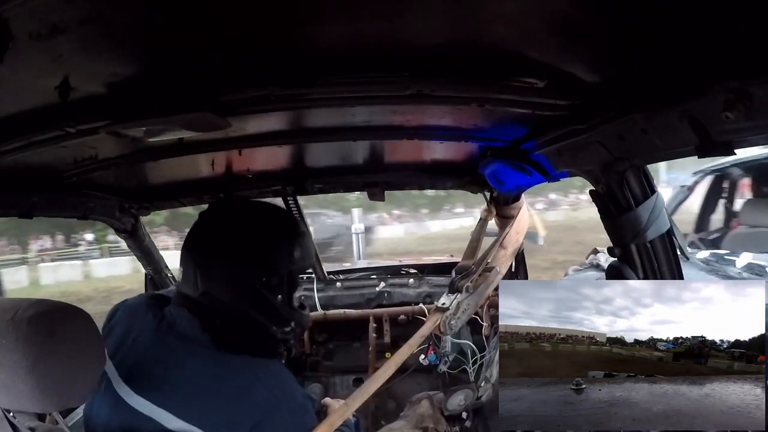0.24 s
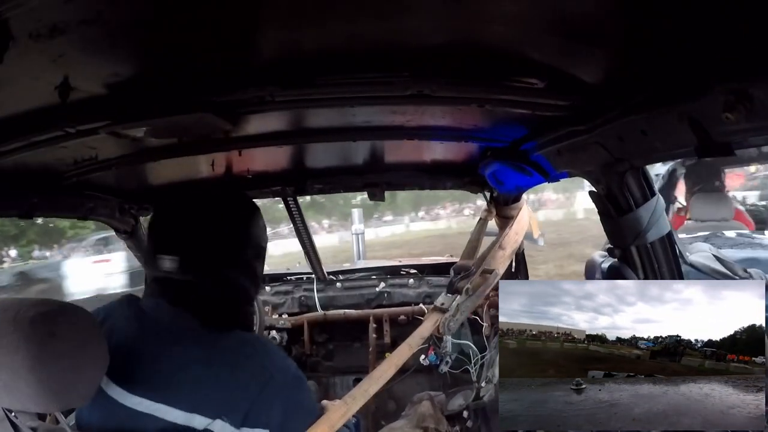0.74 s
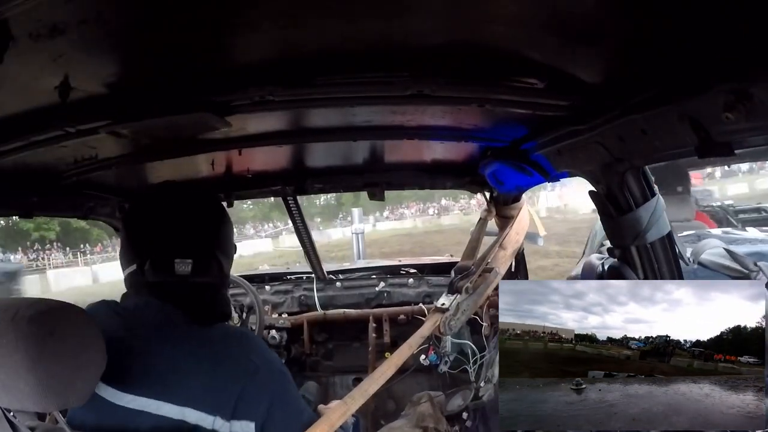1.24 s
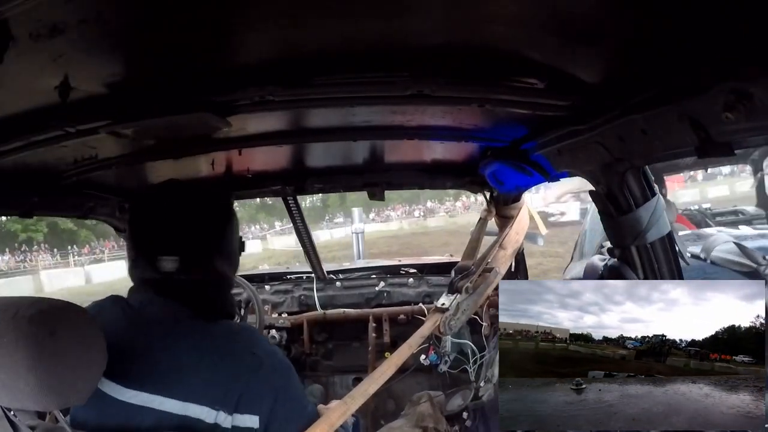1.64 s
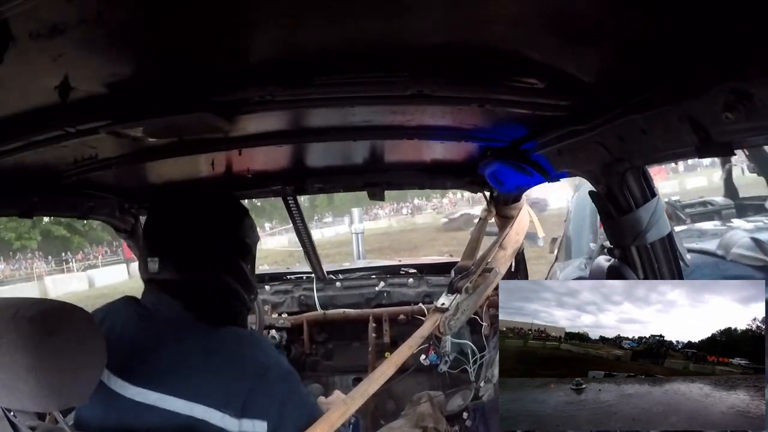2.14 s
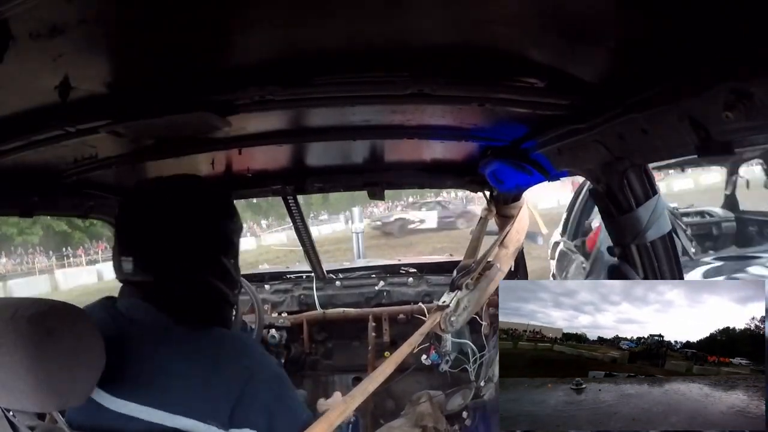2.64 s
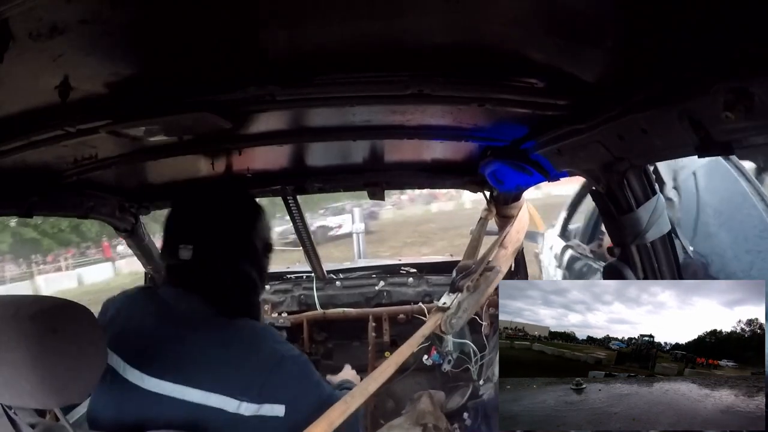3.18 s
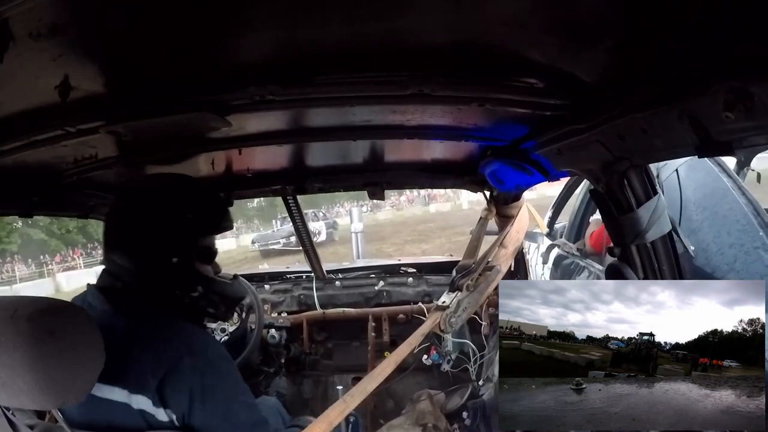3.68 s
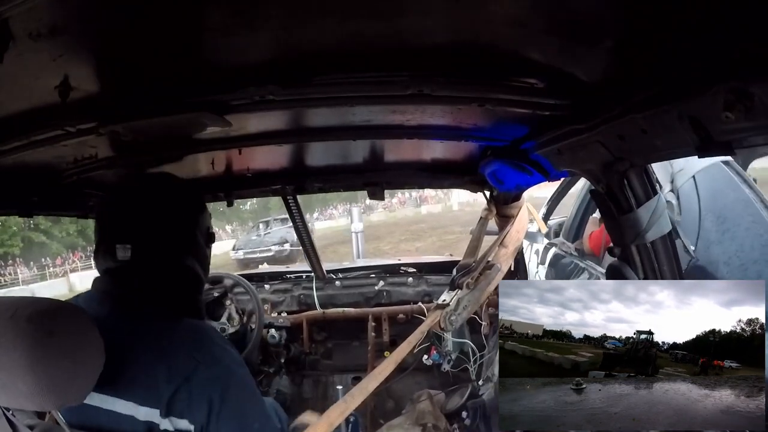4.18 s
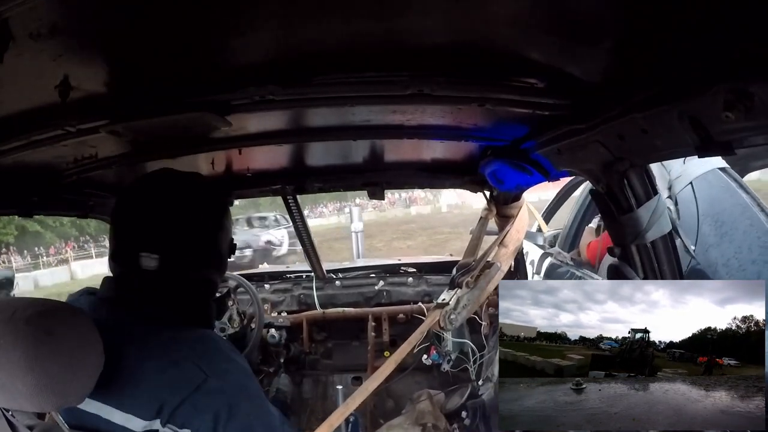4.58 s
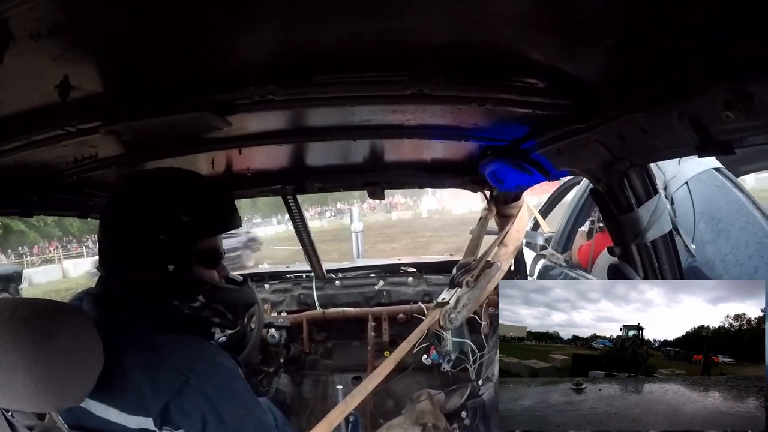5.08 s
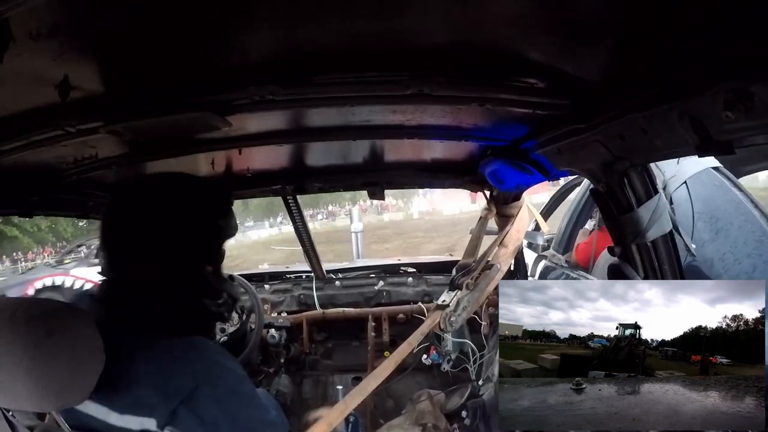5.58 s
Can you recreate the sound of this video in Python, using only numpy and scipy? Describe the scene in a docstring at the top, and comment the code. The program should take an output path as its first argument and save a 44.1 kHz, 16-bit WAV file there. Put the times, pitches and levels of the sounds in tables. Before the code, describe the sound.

Heard from inside a stripped car, a six-cylinder engine roars at steady high revs, drops away, then is blipped three times, its exhaust rasping at the peaks. Another car's engine drones roughly alongside, fading in and out. Throughout, the bare cab booms and loose metal rattles, with bursts of chattering panels, short metallic scrapes and two dull, heavy thumps against the body.

```python
"""Inside a derby car

A six-cylinder engine roars, drops and is blipped three times, its periodic firing heard as harmonics
and as puffs of exhaust noise. A neighbouring car drones alongside. The stripped cab booms in its low
modes, loose metal rattles, struck panels ring, and dragged metal scrapes and sizzles by stick and slip.
At the top of a rev the exhaust rasps."""
import sys
import numpy as np
from scipy import signal
from scipy.io import wavfile
from scipy.ndimage import uniform_filter1d

SR = 44100
rng = np.random.default_rng(int(sys.argv[2]) if len(sys.argv) > 2 else 0)


def dump(signal):
    """Clip the signal to [-1, 1] and save it as 16-bit WAV at the path in sys.argv[1]."""
    limited = np.clip(np.atleast_2d(signal).T, -1, 1)
    pcm = np.round(limited * 32767).astype(np.int16)
    wavfile.write(sys.argv[1], SR, pcm)


N = 256662
DULL_HZ = 9800   # upper edge of everything but the sizzle

# bending modes of the body panels: pitch_hz, relative_db, t60_s
PANEL_MODES = [(626, -7, 0.099), (1164.5, -9.5, 0.15), (1258, -3, 0.046), (1630, 2, 0.01),
               (1720, -3, 0.014), (2210, -10.5, 0.019), (2523, -7, 0.017), (3100, -9.5, 0.0082),
               (4900, -21.5, 0.015)]


def amp(db):
    """Amplitude grows tenfold for each 20 dB."""
    return 10 ** (np.asarray(db) / 20)


def rms_one(x):
    """Normalisation to an rms of 1."""
    return x / np.sqrt(np.mean(x ** 2) + 1e-20)


def in_time(rows):
    """Linear interpolation over the first column, time, turns each other column into a signal."""
    times_s, *columns = np.transpose(rows)
    return [np.interp(np.arange(N) / SR, times_s, column) for column in columns]


def at_hz(response, hz):
    """A frequency response in dB, interpolated on a logarithmic frequency axis."""
    table_hz, level_db = np.transpose(response)
    return np.interp(np.log(hz), np.log(table_hz), level_db)


def bandpass(x, low_hz, high_hz, order):
    """A Butterworth filter passes the band between two edges."""
    return signal.sosfilt(signal.butter(order, [low_hz, high_hz], "band", fs=SR, output="sos"), x)


def drift(rate_hz):
    """Low-passed noise gives a slow random fluctuation of rms 1."""
    step, settle = 40, 2000   # samples per noise value; values dropped while the filter settles
    pole = np.exp(-2 * np.pi * rate_hz * step / SR)
    noise = rng.standard_normal(N // step + settle + 2)
    slow = signal.lfilter([1], [1, -2 * pole, pole * pole], noise)[settle:]
    return np.interp(np.arange(N) / step, np.arange(len(slow)), rms_one(slow))


def ring(clicks, hz, t60_s):
    """A damped oscillator answers a unit impulse with a decaying sine of height 1."""
    decay, angle = amp(-60 / (t60_s * SR)), 2 * np.pi * hz / SR
    return signal.lfilter([0, np.sin(angle)], [1, -2 * decay * np.cos(angle), decay ** 2], clicks + 1e-18)


def tone(turns, level_db, wobble_db, wobble_hz, slip_turns):
    """Random amplitude and phase modulation roughen a sine whose rms wavers about level_db."""
    phase = turns + rng.random() + slip_turns * drift(wobble_hz)
    return np.sqrt(2) * amp(level_db + wobble_db * drift(wobble_hz)) * np.sin(2 * np.pi * phase)


def bands(noise_pair, spectrum, patchy_db, tilt_db=0, flicker_db=0):
    """Spectral shaping in third octaves, each wavering alone; tilt and flicker act on the treble."""
    bottom_hz, top_hz = spectrum[0][0], spectrum[-1][0]
    edges = np.geomspace(bottom_hz, top_hz, round(3 * np.log2(top_hz / bottom_hz)) + 1)
    out = 0
    for k, (low, high) in enumerate(zip(edges, edges[1:])):
        mid = np.sqrt(low * high)
        treble = np.clip(np.log2(mid / 2600) / 1.3, 0, 1)
        tilt_weight = treble + 13.1 * max(np.log2(min(mid, DULL_HZ) / 6200), 0)
        gain_db = at_hz(spectrum, mid) + patchy_db * drift(29) + tilt_weight * tilt_db + treble * flicker_db
        out = out + amp(gain_db) * bandpass(noise_pair[k % 2], low, high, order=3)
    return out


def engine():
    """Periodic firing, three times a bank per cycle, gives harmonics; unequal cylinders fill in between."""
    # firing rate of one bank: time_s, rate_hz
    speed = [(0, 57.3), (.1, 60.35), (.3, 64.63), (.9, 66.33), (1.45, 67.04), (2.4, 66.8), (2.82, 69.34),
             (3.1, 66.34), (3.31, 50.9), (3.43, 41.7), (3.65, 57.64), (3.72, 60.8), (3.84, 63.3),
             (3.92, 63.74), (4.0, 63.1), (4.1, 60.17), (4.2, 54.2), (4.3, 49.54), (4.4, 47.54),
             (4.54, 50.86), (4.7, 54.8), (4.8, 54.53), (4.9, 51.23), (5.14, 44.65), (5.25, 51.73),
             (5.39, 58.9), (5.55, 63.2), (5.64, 64.3), (5.73, 62.8), (5.82, 58)]
    # second and third harmonics of that rate: time_s, second_db, third_db
    low_harmonics = [(0, -29, -7.5), (.1, -17, -16.5), (.3, -9, -22), (.55, -16.5, -38), (.7, -13, -35),
                     (.8, -6.5, -40), (.93, -14, -28), (1.4, -26.5, -33), (1.68, -15, -23),
                     (1.8, -9.5, -28), (2.35, -10, -19), (2.5, -8.5, -13.5), (2.84, -14, -6.5),
                     (2.95, -12, -11.5), (3.11, -9, -16), (3.2, -41, -16.5), (3.4, -13, -13),
                     (3.5, -14, -17.5), (3.68, -26.5, -12.5), (3.75, -22.5, -15), (3.8, -16, -19),
                     (3.9, -24.5, -15), (4.02, -16.5, -18), (4.07, -18.5, -13.5), (4.3, -21, -7),
                     (4.4, -26, -16.5), (4.6, -11, -5.5), (4.67, -17.5, -21), (4.75, -19, -9.5),
                     (4.95, -13, -9), (5.12, -23, -19), (5.22, -19, -13.5), (5.36, -18, -12.5),
                     (5.45, -9, -15), (5.52, -30, -14.5), (5.65, -23, -17), (5.82, -15.5, -13)]
    # higher harmonics: multiple, level_at_55_hz_db, slope_db_per_hz
    high_harmonics = [(4, -24, -0.8), (5, -10, 0.15), (6, -19, -1.9)]
    # throttle, as gain of the higher harmonics: time_s, gain_db
    throttle = [(0, -20), (.1, -9), (.35, 2), (.7, -3), (1.5, -2), (2.5, -2.5), (2.82, -3.5), (2.87, -15),
                (2.92, -3.5), (3.1, -2), (3.25, -21), (3.4, -64), (3.55, -13.5), (3.7, 0.5), (3.9, 0.5),
                (4.1, 4.5), (4.19, 3.5), (4.26, 0), (4.3, -9), (4.45, -1), (4.55, -1), (4.7, 6),
                (4.88, 2.5), (4.93, -7), (5.15, -5.5), (5.24, -0.5), (5.33, 7.5), (5.4, 5.5), (5.6, 7),
                (5.73, 1.5), (5.77, 8.5), (5.82, 4)]
    # exhaust resonance that they glide through: frequency_hz, gain_db
    exhaust_response = [(170, -2.5), (205, 0), (232, -4.5), (262, -2.5), (280, -5.5), (308, -8.5),
                        (330, -14), (348, -23.5), (400, -31)]
    # engine load, as level of the exhaust roar: time_s, level_db
    load = [(0, -33.5), (.2, -30), (.42, -34.5), (.58, -30), (.72, -28.5), (.95, -35), (1.35, -25),
            (1.55, -28.5), (1.75, -25), (2.0, -27), (2.15, -34.5), (2.7, -38.5), (3.06, -26), (3.3, -40),
            (3.45, -31.5), (3.78, -28), (4.1, -28), (4.4, -27.5), (4.75, -31.5), (5.05, -26), (5.3, -36),
            (5.66, -25.5), (5.82, -30.5)]
    # weak orders of the full cycle, from unequal cylinders: order, level_db
    uneven_orders = [(3, -23.5), (4, -44.5), (5, -32.5), (7, -28), (8, -34.5), (10, -30.5), (11, -43.5),
                     (13, -27), (14, -48), (16, -35), (17, -33), (19, -41), (20, -33), (21, -39.5),
                     (22, -45), (24, -43.5), (25, -38), (27, -41), (30, -41.5), (33, -46), (35, -41)]
    # pipe and cab colour on the weak orders: frequency_hz, gain_db
    pipe_response = [(48, -32.5), (66, -0.5), (200, 3.5), (250, -2), (330, -11), (365, -4.5), (430, -2),
                     (520, -1), (680, -4), (760, -7)]
    inertia_s = 0.05   # the flywheel rounds changes of speed
    bank_hz = uniform_filter1d(in_time(speed)[0], int(inertia_s * SR), mode="nearest")
    turns = np.cumsum(bank_hz) / SR
    second_db, third_db = in_time(low_harmonics)
    roar_db, = in_time(load)
    throttle_db, = in_time(throttle)
    burble = 1 + 0.26 * np.maximum(52.83 - bank_hz, 0)   # firing grows uneven as the speed sags
    out = tone(2 * turns, second_db, wobble_db=2.2, wobble_hz=11, slip_turns=0.0093)
    out += tone(3 * turns, third_db, 1.97 * burble, 17.6, 0.047 * burble)
    for multiple, level_db, slope in high_harmonics:
        drive_db = level_db + slope * (bank_hz - 55) + throttle_db
        colour_db = at_hz(exhaust_response, multiple * bank_hz)
        out += tone(multiple * turns, drive_db + colour_db, 1.7 * burble, 19, 0.017 * burble)
    effort_db = 0.65 * (roar_db - np.mean(roar_db)) + 0.26 * throttle_db
    for order, level_db in uneven_orders:
        multiple = order / 3
        colour_db = at_hz(pipe_response, multiple * bank_hz)
        out += tone(multiple * turns, level_db + effort_db + colour_db, 4.5, 12.5, 0.12)
    return out, turns, roar_db


def neighbour():
    """Jitter in rate and phase broadens the partials of the engine alongside into a rough drone."""
    # course of the drone: time_s, firing_hz, level_db
    course = [(0.0, 116.5, -10), (0.41, 127.9, -8), (0.91, 128.4, -16), (1.04, 118.6, -7.5),
              (1.34, 119.2, -6.5), (1.7, 108, -7.5), (1.9, 120.9, -19.5), (2.43, 107, -21), (2.85, 95, -35),
              (3.2, 80, -16), (3.37, 121.6, -16.5), (4.15, 116.4, -12.5), (4.31, 103.6, -31),
              (4.8, 96, -32.5), (5.12, 118, -9), (5.45, 119.0, -14.5), (5.82, 121, -10.5)]
    # partials of its firing rate: multiple, gain_db
    partials = [(0.668, -9.5), (1, -4.5), (1.335, -22), (2.002, -37.5), (2.337, -42)]
    firing_hz, level_db = in_time(course)
    turns = np.cumsum(firing_hz * (1 + 0.014 * drift(7.15))) / SR
    return sum(tone(multiple * turns, level_db + gain_db, 1, 6.7, 0.15) for multiple, gain_db in partials)


def shell_boom():
    """Random forcing excites the low resonances of the bare cab, which boom in uneven swells."""
    # cab modes: centre_hz, width_hz, relative_db
    cab_modes = [(38, 14, -9.5), (56.3, 34, 4.5), (85.13, 3.4, 8), (121.6, 38, 10.5), (155.3, 28, 12),
                 (192.7, 8.3, 5.5)]
    # strength of the boom: time_s, level_db
    swells = [(0, -22), (.1, -11), (.25, -29), (.42, -8), (.55, -15), (.7, -13), (.9, -17), (1.25, -29),
              (1.6, -12), (1.75, -18.5), (2.05, -15.5), (2.25, -12.5), (2.45, -13.5), (2.9, -11),
              (3.08, -14), (3.35, -19), (3.5, -12), (3.8, -17), (4.25, -29.5), (4.42, -12), (4.85, -28.5),
              (5.05, -20), (5.35, -25), (5.82, -22)]
    boom = 0
    for hz, width, mode_db in cab_modes:
        mode = bandpass(rng.standard_normal(N), hz - width / 2, hz + width / 2, order=2)
        boom = boom + amp(mode_db) * rms_one(mode)
    level_db, = in_time(swells)
    return amp(level_db + 2.5 * drift(6.9)) * rms_one(boom)


def exhaust_roar(turns, level_db):
    """Amplitude modulation: exhaust noise puffs once for each firing of a bank."""
    # spectral density of the roar: frequency_hz, relative_db
    spectrum = [(130, -34.5), (220, 8), (274, -10), (327, -16.5), (372, -5), (432, -5), (998, -35),
                (1200, -29.5), (1560, -61.5), (2640, -120)]
    puffs = 1 + np.cos(2 * np.pi * turns)
    roar = bands(puffs * rng.standard_normal((2, N)), spectrum, patchy_db=1)
    return amp(level_db + 2.5 * drift(11)) * rms_one(roar)


def rattle():
    """Random impacts of loose metal form shot noise over a scraping hiss and ring the panel modes."""
    # steady shaking: time_s, level_db, brightness_db
    shaking = [(0, -34.5, -9.5), (.3, -33, -9), (1.03, -35, -8.5), (1.06, -33.5, -16), (1.1, -35, -9),
               (1.48, -34.5, -8), (1.52, -35.5, -9.5), (1.65, -33.5, -9), (1.9, -34, -9), (2.0, -33, -11),
               (2.7, -38, -10.5), (3.05, -36.5, -7), (3.075, -34, -8.5), (3.2, -39.5, -8.5),
               (3.24, -48.5, -14.5), (3.34, -37.5, -7.5), (3.55, -39.5, -10), (4.1, -35.5, -9),
               (4.23, -40, -19), (4.45, -38, -8), (4.6, -36.5, -8.5), (4.82, -32.5, -8),
               (4.9, -32.5, -10.5), (5.2, -36.5, -9), (5.82, -35.5, -10)]
    # jolts that briefly shake the metal harder: centre_s, length_s, gain_db, brightness_db
    jolts = [(0.444, 0.19, 5.5, 3), (0.682, 0.16, 2.5, 0.5), (0.872, 0.15, 6, 2), (1.365, 0.21, 5, 0),
             (1.611, 0.033, 4.5, -7), (1.725, 0.027, 2.5, -6.5), (1.965, 0.054, 3.5, -2.5),
             (2.146, 0.044, 3, 0), (2.431, 0.035, 6.5, 2.5), (2.57, 0.097, 2, 1), (2.828, 0.042, 7.5, -5.5),
             (2.946, 0.045, 8, -0.5), (3.021, 0.051, 9, 0.5), (3.392, 0.063, 2, -2.5), (4.341, 0.038, 6, 7),
             (4.537, 0.11, 6, 0), (5.029, 0.099, 5.5, 3), (5.103, 0.026, 5.5, 3.5),
             (5.295, 0.075, 2.5, -0.5), (5.504, 0.28, 3.5, 1.6), (5.677, 0.067, 5, 3)]
    # spectral density of the loose metal: frequency_hz, relative_db
    spectrum = [(350, -36), (600, 1.5), (748, -0.5), (890, 0), (1220, -5.5), (1500, -4.5), (1740, -3.5),
                (2810, -8.5), (3230, -9), (4260, -17.5), (6620, -16.5), (8950, -57), (9600, -65.5),
                (12500, -51), (21100, -120)]
    level_db, bright_db = in_time(shaking)
    t = np.arange(N) / SR
    for centre_s, length_s, gain_db, edge_db in jolts:
        jolt = np.exp(-0.5 * (2 * (t - centre_s) / length_s) ** 2)
        level_db += gain_db * jolt
        bright_db += edge_db * jolt
    tilt_db = bright_db - 0.0851 * level_db
    tilt_db -= np.mean(tilt_db)
    sizes = amp(5.5 * np.minimum(rng.exponential(1, N), 5)) * rng.choice([-1, 1], N)
    contacts_per_s = 900 * amp(5 * drift(25))
    clicks = rms_one(sizes * (rng.random(N) < contacts_per_s / SR))
    source = 0.3 * clicks + rng.standard_normal((2, N))
    clatter = bands(source, spectrum, patchy_db=2.5, tilt_db=tilt_db, flicker_db=2 * drift(15))
    panel_hits = rng.random(N) < 350 / SR
    rings = sum(amp(mode_db) * ring(panel_hits * rng.normal(0, 1, N), hz, t60_s)
                for hz, mode_db, t60_s in PANEL_MODES)
    metal = rms_one(clatter) + amp(-6.5) * rms_one(rings)
    split_hz = 7050   # above this the rattle comes in short patches, at its brighter moments
    body = signal.sosfilt(signal.cheby1(8, 1, split_hz, "low", fs=SR, output="sos"), metal)
    top = signal.sosfilt(signal.cheby1(8, 1, split_hz, "high", fs=SR, output="sos"), metal)
    top_db = np.clip(6 * (tilt_db - 0.9) + 5 * drift(30), -40, 0)
    return amp(level_db) * (body + amp(top_db) * top)


def bangs():
    """Impulse response: each blow cracks, rings the struck part and excites a new mix of panel modes."""
    # a panel chattering against the cage: start_s, ring_db, pitch_hz, crack_db
    chatter = [(.2968, -22.5, 1120, -29), (0.3288, -27, 1960, -33), (0.3552, -26, 1100, -35),
               (0.38, -22, 1740, -42), (0.404, -19.5, 1050, -29), (0.426, -22, 1630, -22),
               (0.4454, -25, 1780, -25), (0.4654, -22, 1180, -31), (.468, -18.5, 1730, -35),
               (0.484, -28, 1840, -34), (0.505, -21, 1300, -37), (.523, -28, 1150, -30),
               (0.544, -20.5, 1100, -39), (0.565, -25, 1310, -40), (0.7924, -25, 1750, -42),
               (.838, -21, 1190, -33), (0.858, -35, 1100, -28), (0.8799, -21.5, 1050, -29),
               (0.898, -19, 1440, -24), (0.918, -19, 1040, -28), (0.936, -21, 1210, -35),
               (.955, -30, 1300, -37), (0.974, -29, 1090, -38), (1.272, -23, 1100, -33),
               (1.294, -33, 1099, -30), (1.319, -21, 1310, -25), (1.3404, -17, 1020, -27),
               (1.363, -37, 1110, -28), (1.386, -35, 1140, -30), (1.465, -27, 900, -36)]
    # single blows on the panels: start_s, ring_db, pitch_hz, crack_db
    blows = [(0.679, -24.5, 1250, -30), (0.72, -32, 395, -49), (0.9899, -25, 960, -37),
             (1.409, -31, 416, -38), (1.694, -22, 1030, -45), (1.80, -35.5, 1500, -39),
             (1.895, -43.5, 1300, -42.5), (2.1172, -27, 1260, -55), (2.331, -39, 1600, -35),
             (2.4237, -19, 1003, -52), (2.5113, -27.5, 1012, -39), (2.918, -28, 3400, -34),
             (2.939, -33, 3420, -30), (2.987, -31, 5000, -32), (2.944, -24, 1000, -32),
             (3.008, -30, 1870, -29), (3.0203, -24, 1900, -24), (3.036, -24, 3450, -27),
             (3.277, -35, 1160, -36.5), (3.953, -36, 720, -55), (4.328, -35, 1108, -44),
             (4.352, -38, 1500, -41), (4.364, -30.5, 750, -40), (4.7632, -33, 1281, -54),
             (4.801, -27, 1663, -38), (4.971, -29, 1620, -29), (5.078, -46, 1260, -24),
             (5.2217, -26, 730, -51), (5.245, -27, 1400, -51), (5.6454, -27.5, 1320, -43)]
    start_s, ring_db, pitch_hz, crack_db = np.transpose(blows + chatter)
    starts = np.round(start_s * SR).astype(int)
    coupling_db = rng.normal(-6.5, 3.5, (len(starts), len(PANEL_MODES)))   # modes against the struck part
    out = crack(starts, crack_db)
    for k, (hz, mode_db, t60_s) in enumerate(PANEL_MODES):
        clicks = np.zeros(N)
        clicks[starts] = amp(ring_db + mode_db + coupling_db[:, k])
        out += ring(clicks, hz, t60_s)
    t, part_t60_s = np.arange(SR // 8) / SR, 0.036
    for start, level_db, hz in zip(starts, ring_db, pitch_hz):
        part = amp(level_db - 60 * t / part_t60_s) * np.sin(2 * np.pi * hz * t)
        out[start:start + len(t)] += part[:N - start]
    return out


def crack(starts, level_db, t60_s=0.047):
    """A brief contact has a broad spectrum: a fast-decaying burst of noise at each blow."""
    clicks = np.zeros(N)
    clicks[starts] = amp(level_db)
    fade = signal.lfilter([1], [1, -amp(-60 / (t60_s * SR))], clicks + 1e-18)
    return bandpass(fade * rng.standard_normal(N), 2200, 8500, order=5)


def driven_resonance(strokes, clicks_per_s, order=2):
    """Random impulses drive one resonance for the length of each stroke, under an arched envelope."""
    out = np.zeros(N)
    clicks = rng.standard_normal(N) * (rng.random(N) < clicks_per_s / SR)
    for start_s, length_s, hz, width, level_db in strokes:
        start, end = round(start_s * SR), min(round((start_s + length_s) * SR), N)
        ringing = bandpass(clicks[start:end] + 1e-18, hz - width / 2, hz + width / 2, order)
        arch = np.sqrt(np.abs(np.sin(np.pi * np.arange(end - start) / (length_s * SR))))
        out[start:end] += amp(level_db) * arch * rms_one(ringing)
    return out


def scrapes():
    """Stick-slip friction: metal dragged on metal rings under a stream of small slips. The first stroke is
    instead a short hollow thud near 700 Hz."""
    # strokes, the first a thud: start_s, length_s, pitch_hz, width_hz, level_db
    strokes = [(0.657, 0.097, 700, 200, -28), (2.16, 0.052, 656, 121, -30), (0.38, 0.15, 1760, 300, -33),
               (0.673, 0.049, 1275, 119.8, -31), (0.836, 0.41, 1130, 200, -38.5),
               (1.303, 0.22, 910, 300, -30.5), (2.92, .07, 1100, 900, -30.5), (2.92, 0.044, 2300, 900, -40),
               (2.985, 0.077, 1940, 620, -29.5), (2.842, 0.026, 1900, 1190, -35),
               (3.17, 0.037, 1230, 500, -39), (3.003, 0.053, 3550, 400, -42),
               (3.266, 0.2, 1730, 350, -39.5), (3.29, 0.15, 6360, 1300, -41.5),
               (4.49, 0.15, 1170, 153.1, -36.5), (4.522, 0.13, 1870, 248.9, -38),
               (4.965, 0.06, 1640, 260, -26.5), (5.015, 0.047, 1470, 250, -29.5),
               (5.012, 0.046, 3100, 900, -35), (5.075, 0.051, 3030, 1200, -33.5),
               (5.085, 0.047, 1440, 300, -38), (5.63, 0.093, 1330, 119, -35)]
    return driven_resonance(strokes, clicks_per_s=4000)


def sizzle():
    """In the hardest scrapes, dense slips excite resonances in the high treble."""
    # strokes: start_s, length_s, pitch_hz, width_hz, level_db
    strokes = [(.39, .1, 10400, 1200, -59), (.855, .05, 10600, 1400, -54), (1.335, 0.069, 10500, 1000, -59),
               (1.335, .055, 13500, 1500, -68), (4.935, .07, 13500, 2000, -57),
               (4.985, 0.077, 12870, 1795, -54), (5.065, .06, 13000, 2600, -58),
               (4.935, 0.19, 8500, 1600, -54.5), (5.07, .055, 9906, 1210, -54),
               (5.512, .035, 13000, 1598, -74), (5.512, 0.034, 9250, 1395, -58)]
    return driven_resonance(strokes, clicks_per_s=9000, order=4)


def thumps():
    """Forced resonance: a heavy, soft blow drives the whole body, which swells before it dies away."""
    # body blows: start_s, push_db, pitch_hz, body_t60_s
    blows = [(1.633, -1.5, 85.4, 0.12), (3.449, -3, 82.9, 0.16)]
    out = np.zeros(N)
    for start_s, push_db, hz, body_t60_s in blows:
        push = np.zeros(N)
        push[round(start_s * SR)] = amp(push_db)
        force = ring(push, hz, t60_s=0.22) * 200 / SR
        out += ring(force, hz, body_t60_s)
    return out


def exhaust_rasps():
    """Irregular pulses excite a narrow exhaust resonance at the top of a rev."""
    # rasps: start_s, length_s, pitch_hz, width_hz, level_db
    rasps = [(3.88, 0.32, 704, 98, -34), (4.19, 0.097, 681.4, 60, -36), (5.4, 0.19, 772, 100, -29),
             (5.56, 0.32, 720, 140.5, -30.5)]
    return driven_resonance(rasps, clicks_per_s=1200)


def scene():
    """Superposition: all sources add at one point in the cab; only the sizzle escapes the low-pass."""
    motor, turns, roar_db = engine()
    cab = motor + neighbour() + shell_boom() + exhaust_roar(turns, roar_db)
    cab += rattle() + bangs() + scrapes() + thumps() + exhaust_rasps()
    cab = signal.sosfilt(signal.ellip(6, 0.5, 60, DULL_HZ, fs=SR, output="sos"), cab)
    return (cab + sizzle())[None]


def record(dry):
    """Soft saturation rounds the peaks, between a bass cut and a treble cut."""
    bass_cut = signal.sosfilt(signal.butter(2, 35, "high", fs=SR, output="sos"), dry)
    rounded = 1.12 * np.tanh(bass_cut / 1.26)
    return signal.sosfilt(signal.ellip(8, 0.5, 70, 15000, fs=SR, output="sos"), rounded)


dry = scene()
out = record(dry)
dump(out)
```